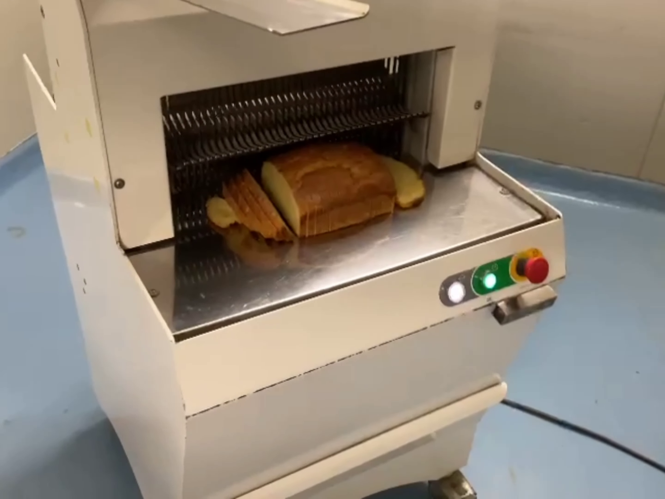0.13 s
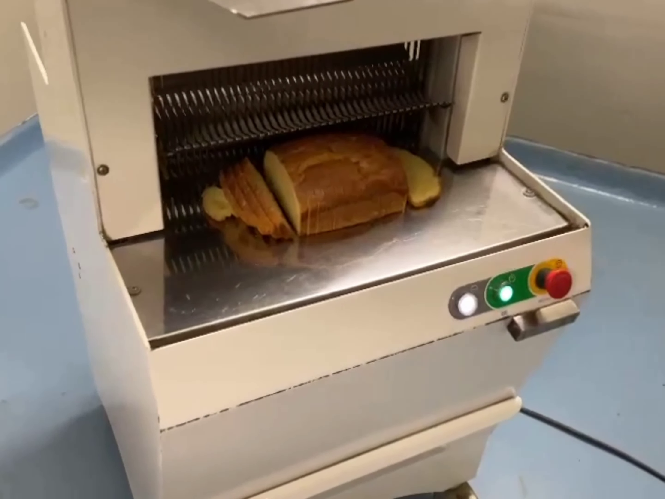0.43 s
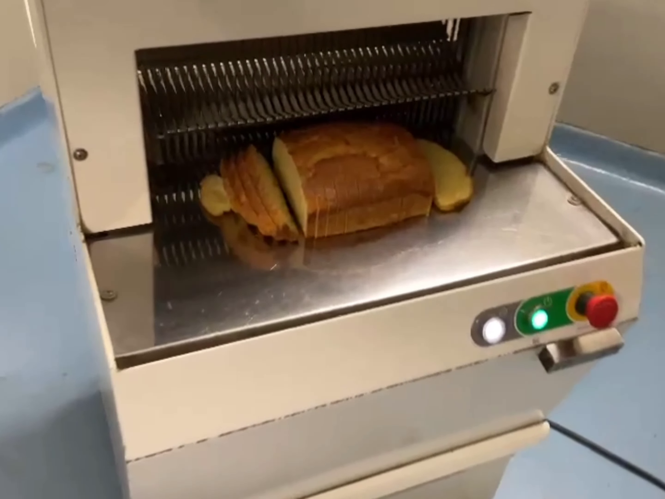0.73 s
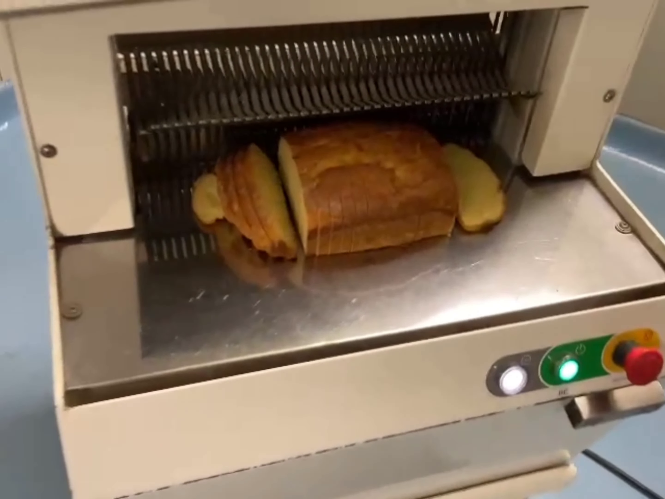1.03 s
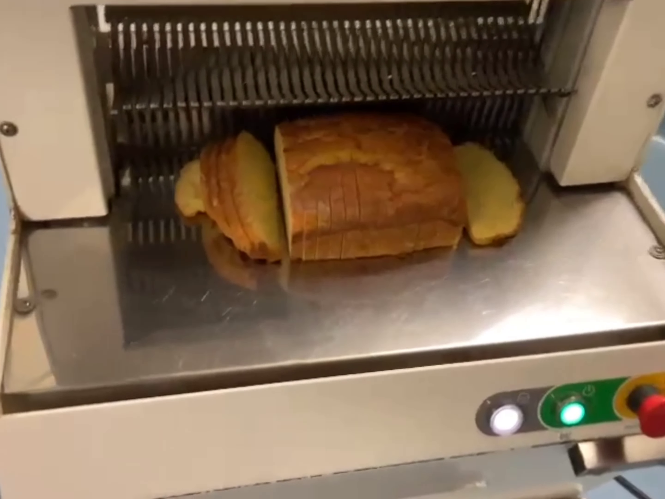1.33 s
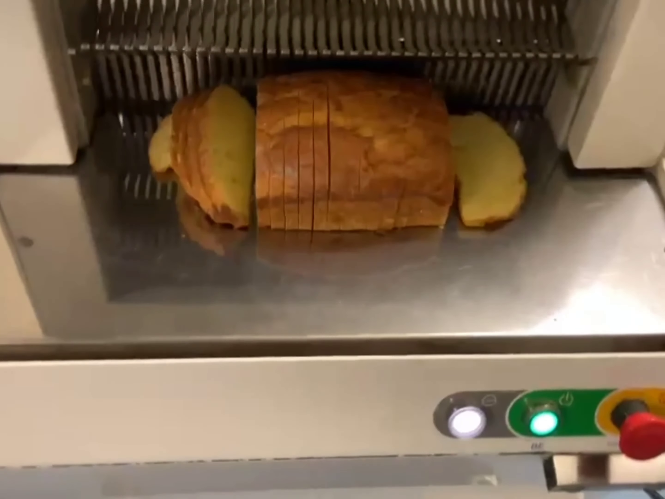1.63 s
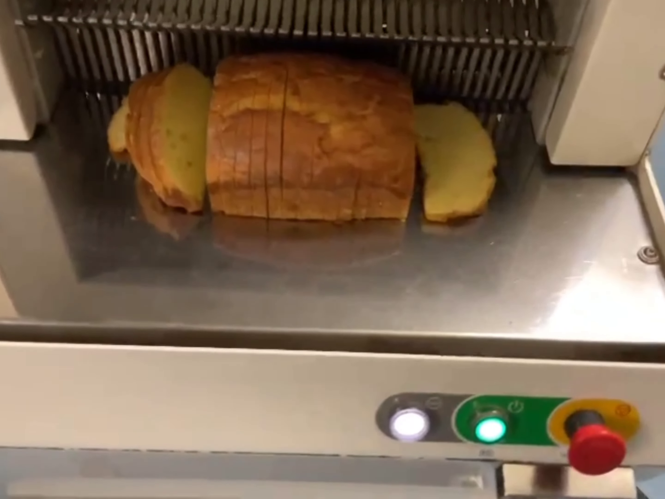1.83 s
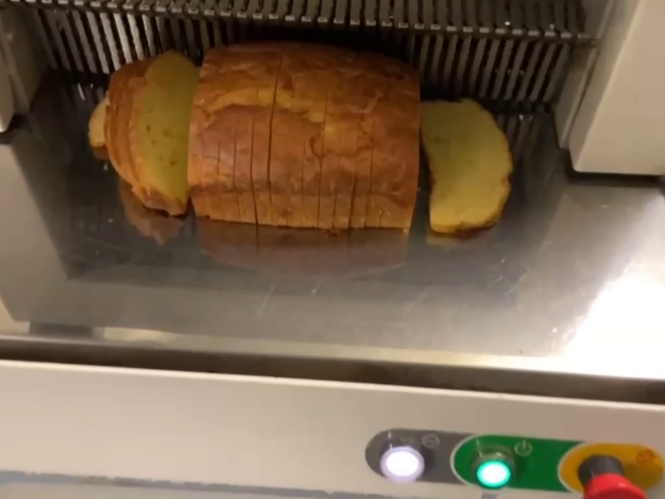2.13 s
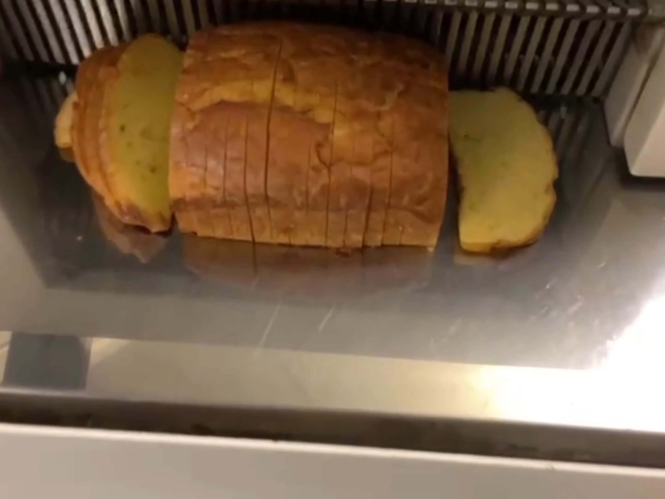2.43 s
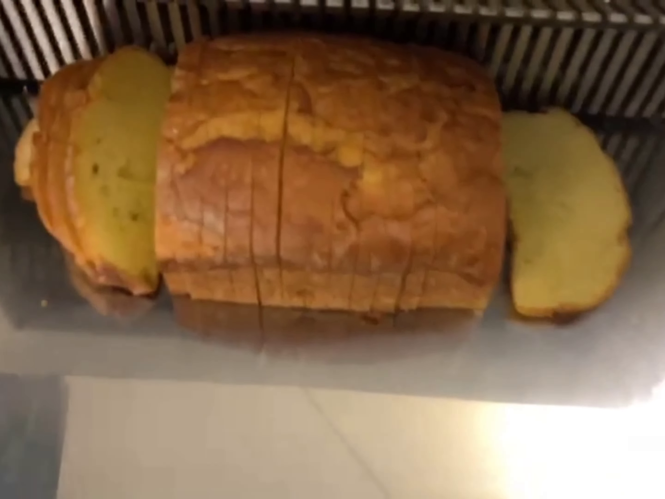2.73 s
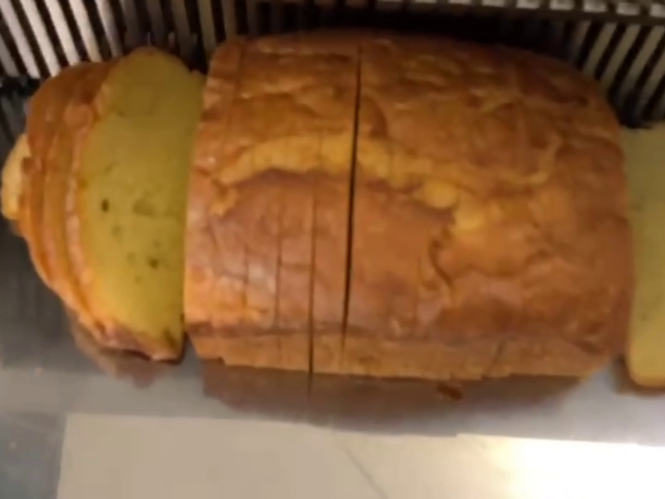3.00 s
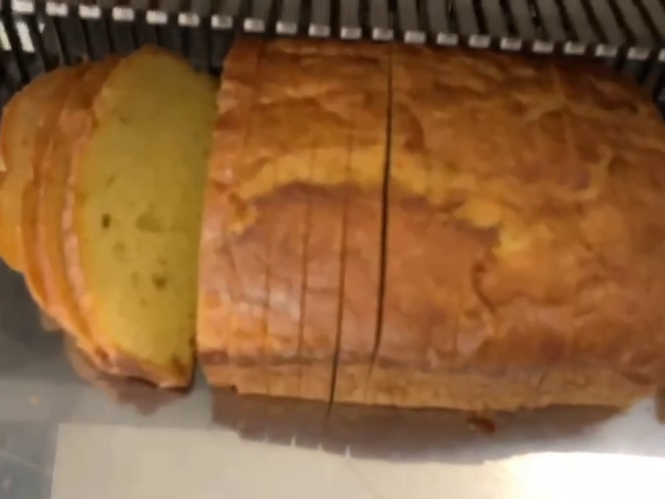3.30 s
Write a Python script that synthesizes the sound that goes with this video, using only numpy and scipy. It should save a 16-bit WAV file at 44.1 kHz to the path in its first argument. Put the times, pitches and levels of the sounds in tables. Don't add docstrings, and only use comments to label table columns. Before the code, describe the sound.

Motor hum of a bread slicer throbs fast, with metal rattle and soft blade hiss

```python
import sys
import numpy as np
from scipy import signal
from scipy.fft import rfft, irfft
from scipy.io import wavfile

SR = 44100
rng = np.random.default_rng(int(sys.argv[2]) if len(sys.argv) > 2 else 0)


def store_pcm(level_fs):
    pcm = np.round(np.clip(level_fs, -1, 1) * 32767).astype(np.int16)
    wavfile.write(sys.argv[1], SR, np.atleast_2d(pcm).T)


def undo_db(level):
    steps = np.asarray(level, float) / 20
    return 10 ** steps


N = 152586
TREBLE_HZ = 7600

# pitch_hz, width_hz, pull_level_db, rattle_level_db
PANEL_MODES = [(72.9, 5.2, -4.5, 1.5), (114.3, 26.2, 2, -7.5), (152.3, 5.9, 12.5, -1),
               (200.8, 68.5, -9.5, -6), (274.2, 24.4, -4.5, -2.5), (303.9, 18.8, -5, -6.5),
               (388.7, 45, -12.5, -9.5), (426.8, 25.3, 5.5, -13), (584, 165, -46, -13),
               (715.2, 22, -13, -8), (798, 44, -40, -14.5), (941, 202, -37, -20), (1348, 190, -33, -29),
               (1547, 200, -40, -23)]
# pitch_hz, likeness (0-1)
ROOM_LIKENESS = [(60, 0.96), (170, 0.91), (400, 0.52), (900, 0.27), (1500, 0.03), (3000, 0)]


def rms_one(x):
    return x / np.sqrt(np.mean(x ** 2) + 1e-20)


def in_time(rows):
    return np.interp(np.arange(N) / SR, *np.transpose(rows))


def at_hz(points, hz):
    point_hz, value = np.transpose(points)
    return np.interp(np.log(hz), np.log(point_hz), value)


def soft_step(at_s, rise_s):
    return 0.5 + 0.5 * np.tanh((np.arange(N) / SR - at_s) / rise_s)


def drift(rate_hz):
    r = np.exp(-80 * np.pi * rate_hz / SR)
    slow = signal.lfilter([1], [1, -2 * r, r * r], rng.standard_normal(N // 40 + 2002))[2000:]
    return np.interp(np.arange(N) / 40, np.arange(len(slow)), rms_one(slow))


def resonate(x, hz, width_hz):
    r = np.exp(-np.pi * width_hz / SR)
    poles = [1, -2 * r * np.cos(2 * np.pi * hz / SR), r * r]
    return signal.lfilter([(1 - r * r) / 2, 0, (r * r - 1) / 2], poles, x)


def crank(peak_s, turns):
    crank_hz = 10.2
    return np.cos(2 * np.pi * crank_hz * turns * (np.arange(-SR, N) / SR - peak_s))


def split(three, hz, gain):
    # pitch_hz, share (0-1)
    straight_share = [(500, 0.06), (1500, 0.07), (3500, 0), (5000, 0.07), (6300, 1), (7500, 1), (8800, 0.9),
                      (11000, 0.86)]
    straight = np.clip(at_hz(straight_share, hz), 0, 1)
    alike = np.clip(at_hz(ROOM_LIKENESS, hz), -1, 1)
    room = 1 - straight
    return gain * three * np.sqrt([[straight], [room * (1 + alike) / 2], [room * (1 - alike) / 2]])


def ports(straight, mid, side):
    # pitch_hz, lag_half_turns
    port_lag = [(0, 0), (5900, 5), (6450, 6), (7600, 7), (8700, 7), (9800, 8), (22050, 8)]
    # pitch_hz, left_minus_right_db
    cabinet_lean = [(60, 2), (170, -1.5), (490, 3), (1420, 0.4), (4060, -0.3), (9000, 1.5)]
    hz = np.arange(N // 2 + 1) * SR / N
    late = np.exp(-1j * np.pi * np.interp(hz, *np.transpose(port_lag)))
    lean = undo_db(at_hz(cabinet_lean, hz + 1) / 2)
    left = rfft(straight) * late + rfft(mid + side)
    right = rfft(straight + mid - side)
    return np.array([irfft(left * lean, N), irfft(right / lean, N)])


def banded_noise(spectrum, patchy_db, shared, treble_db, shade_db):
    treble_follows, dull_follows, dull_hz = 1.01, 0.11, 2800
    lowest_hz, highest_hz = spectrum[0][0], spectrum[-1][0]
    edges = lowest_hz * 2 ** np.arange(0, np.log2(highest_hz / lowest_hz) + 0.3, 0.4)
    together, white = drift(24), rng.standard_normal((2, 3, N))
    out = 0
    for k, (low, high) in enumerate(zip(edges, edges[1:])):
        hz = np.sqrt(low * high)
        band = signal.sosfilt(signal.butter(2, [low, high], "band", fs=SR, output="sos"), white[k % 2])
        treble = 1 / (1 + (TREBLE_HZ / hz) ** 4)
        dull = 1 / (1 + (hz / dull_hz) ** 4)
        flicker_db = patchy_db * (shared * together + drift(14.2))
        view_db = treble_db * (treble_follows * treble - dull_follows * dull)
        level_db = at_hz(spectrum, hz) + flicker_db + shade_db * treble + view_db
        out = out + split(band, hz, undo_db(level_db))
    return rms_one(ports(*out))


def running_gear(near_db):
    # pitch_hz, level_db_per_hz
    gear_spectrum = [(22, -10), (60, -12.5), (130, 2.5), (320, -10), (480, -13), (900, -15), (1700, -24),
                     (2400, -45)]
    rumble = banded_noise(gear_spectrum, patchy_db=2.5, shared=0.85, treble_db=-5, shade_db=0)
    return undo_db(-24 + 0.96 * near_db) * rumble


def catches():
    # start_s (middle of the bell), length_s, pitch_hz, level_db
    scrapes = [(0.218, 0.011, 890, -35), (0.268, .03, 2800, -45), (0.77, 0.075, 3250, -45.5),
               (0.823, .02, 557, -28), (0.826, .04, 380, -23), (1.13, 0.044, 1600, -36),
               (1.387, 0.16, 1390, -38.5), (1.7, 0.14, 10300, -50), (1.895, 0.1, 710, -33),
               (1.95, 0.03, 1300, -38), (2.306, .035, 1310, -34), (2.44, 0.035, 1500, -40),
               (2.83, 0.048, 1330, -39), (3.123, .06, 130, -24), (3.364, 0.066, 131, -21.5),
               (3.42, 0.044, 1020, -38.5)]
    width_share = 0.2
    out, t = np.zeros((2, N)), np.arange(N) / SR
    noise = rng.standard_normal((3, N))
    for s, length_s, hz, db in scrapes:
        span = slice(int(max(s - 4 * length_s - 0.05, 0) * SR), int((s + 4 * length_s) * SR))
        width_hz = width_share * hz
        mid, side = rms_one(resonate(resonate(noise[:2, span], hz, width_hz), hz, width_hz))
        apart = np.sqrt(1 - np.clip(at_hz(ROOM_LIKENESS, hz), 0, 1)) * (hz < TREBLE_HZ)
        stroke = np.exp(-((t[span] - s) / length_s) ** 2)
        out[:, span] += undo_db(db) * stroke * (mid + apart * side * [[0.5], [-0.5]])
    return out


def rattle(near_db):
    tray_db, tray_hz, tray_octaves = 5.5, 311, 0.47
    patchy_db = 0.97
    over_tray = soft_step(2.53, 0.083)
    load_db = 1 * crank(0.034, 0.99)[SR:]
    out = 0
    for hz, width_hz, _, panel_db in PANEL_MODES:
        wide_hz = width_hz * 1.26
        noise = resonate(resonate(rng.standard_normal((3, N)), hz, wide_hz), hz, wide_hz)
        tray = over_tray * np.exp(-(np.log2(hz / tray_hz) / tray_octaves) ** 2)
        level_db = panel_db + tray * (tray_db + 2.05 * load_db) + patchy_db * drift(7.2)
        out = out + split(noise, hz, undo_db(level_db))
    return undo_db(-23 + 0.65 * near_db + load_db) * rms_one(ports(*out))


def blades():
    # pitch_hz, level_db_per_hz
    blade_spectrum = [(900, -4), (2200, 2), (3600, 0.5), (5700, -4.5), (6800, -3), (8200, -17),
                      (10400, -12), (12500, -36)]
    # start_s, level_db
    opening = [(0, -45), (.6, -45.5), (.9, -43), (.96, -41), (1.02, -43), (1.05, -37), (1.16, -41.5),
               (1.3, -40), (1.55, -43), (1.8, -39.5), (2.22, -43), (2.3, -39.5), (2.62, -41), (3.05, -39.5),
               (3.12, -36), (3.23, -35), (3.31, -41), (3.46, -41)]
    open_db = in_time(opening)
    flutter_db = 1 * crank(0.018, 1.7)[SR:]
    guard_db = -6 * (1 - soft_step(0.94, 0.025))
    hiss = banded_noise(blade_spectrum, patchy_db=1.7, shared=0.19,
                        treble_db=open_db - open_db.mean() + flutter_db, shade_db=guard_db)
    return undo_db(open_db + 5 + flutter_db) * hiss


def motor(near_db):
    # start_s, level_db
    core_hum = [
        (0.0, -28.5),
        (1.14, -26.5),
        (3.35, -35.5),
        (3.38, -42),
        (3.46, -29),
    ]
    pull_hz, wobble_rad, hum_wander_rad = 100.1, 0.061, 0.46
    pull_slope_db = -5.5
    t = np.arange(-SR, N) / SR
    load_growth = undo_db(3 * (t - 4.0))
    load = 0.11 + load_growth * np.exp(2.6 * (crank(0.027, 0.99) - 1))
    phase = 2 * np.pi * pull_hz * t + wobble_rad * crank(0.088, 0.92)
    pulls = load * sum(undo_db(pull_slope_db * np.log2(k)) * np.cos(k * phase) for k in range(1, 9))
    rings = 0
    for k, (hz, width_hz, panel_db, _) in enumerate(PANEL_MODES):
        rings = rings + (-1) ** k * undo_db(panel_db) * resonate(pulls, hz, width_hz)
    shaken = undo_db(-23.5 + 0.17 * near_db + 0.8 * drift(1.4)) * rms_one(rings[SR:])
    swell_db = 2.0 * crank(0.061, 1.0)[SR:] + 4.5 * crank(0.035, 2)[SR:] + 1.7 * drift(2.7)
    hum_phase = 4 * np.pi * pull_hz * t[SR:] + hum_wander_rad * drift(4.0)
    hum = undo_db(in_time(core_hum) + swell_db) * np.sqrt(2) * np.sin(hum_phase)
    return (shaken + hum) * undo_db(np.array([[-0.3], [0.3]]))


def scene():
    # start_s, level_db
    nearness = [(0.0, -20.5), (1.72, -19), (2.15, -20), (2.19, -15.5), (2.77, -18), (3.18, -14), (3.2, -14),
                (3.46, -18)]
    near_db = in_time(nearness)
    near_db = near_db - near_db.mean()
    return running_gear(near_db) + catches() + rattle(near_db) + blades() + motor(near_db)


def band_limit(x):
    return signal.sosfilt(signal.butter(12, 11750, fs=SR, output="sos"), x)


def record(dry):
    cut = signal.sosfilt(signal.butter(2, 60, "high", fs=SR, output="sos"), dry)
    cut = cut - 0.38 * resonate(cut, hz=1833, width_hz=137)
    return band_limit(cut)


dry = scene()
out = record(dry)
store_pcm(out)
```